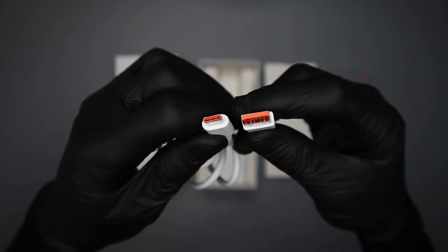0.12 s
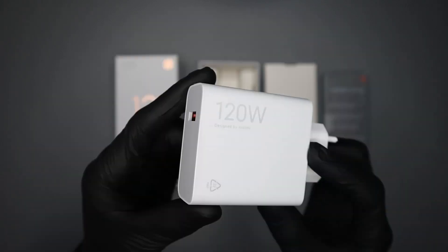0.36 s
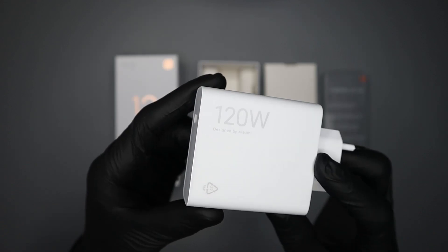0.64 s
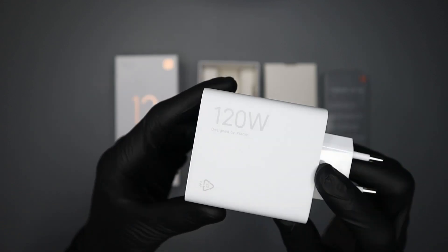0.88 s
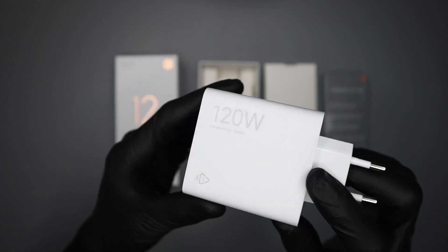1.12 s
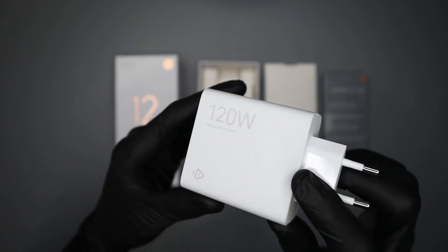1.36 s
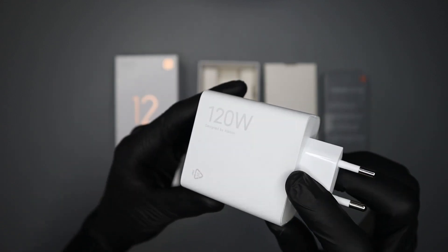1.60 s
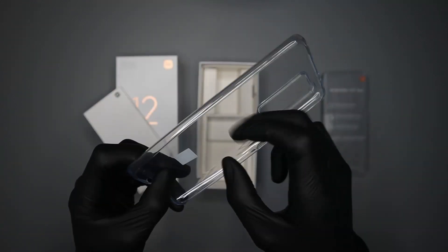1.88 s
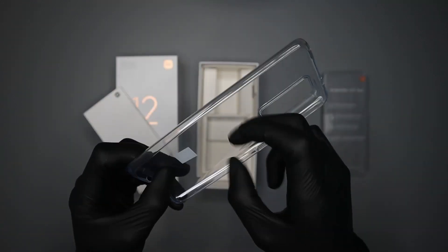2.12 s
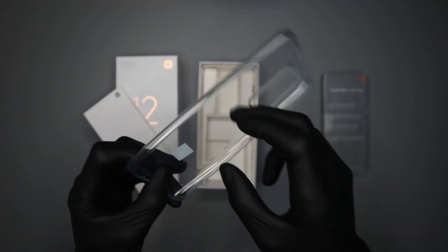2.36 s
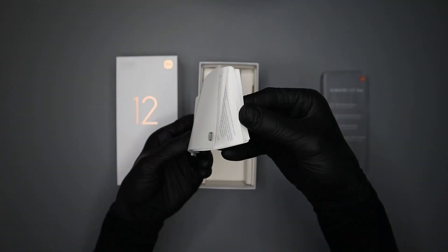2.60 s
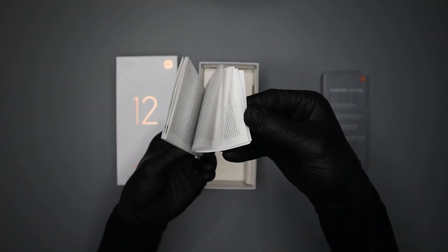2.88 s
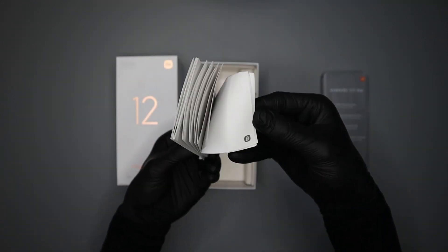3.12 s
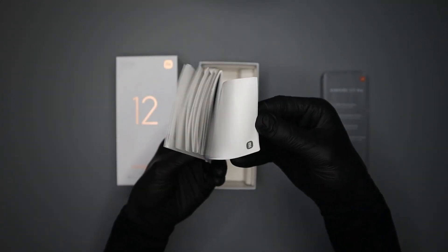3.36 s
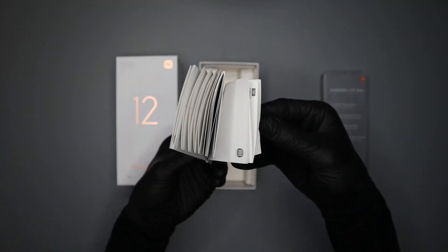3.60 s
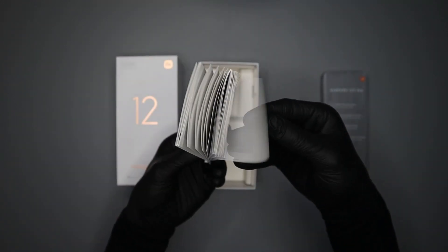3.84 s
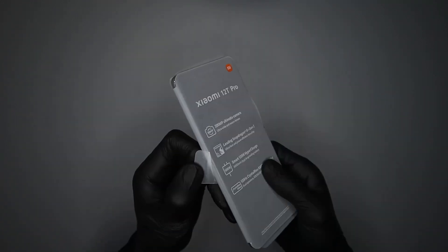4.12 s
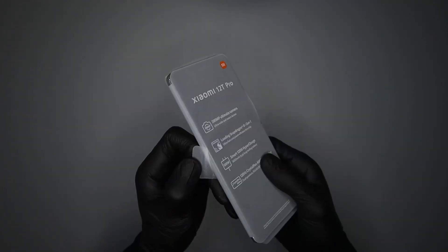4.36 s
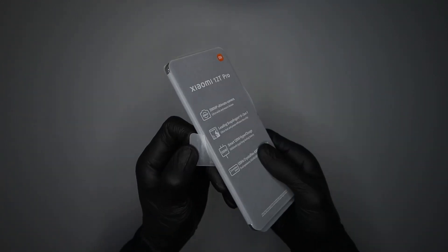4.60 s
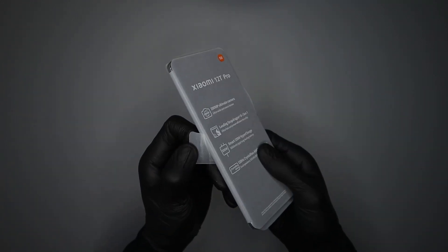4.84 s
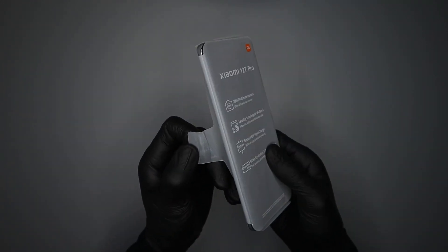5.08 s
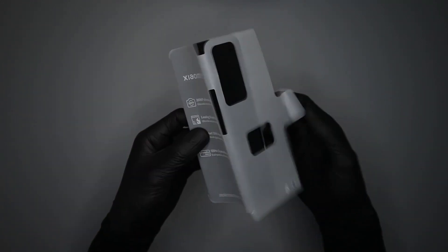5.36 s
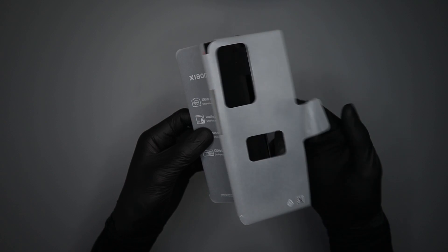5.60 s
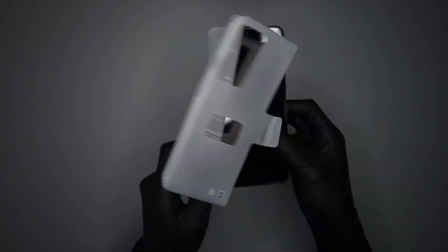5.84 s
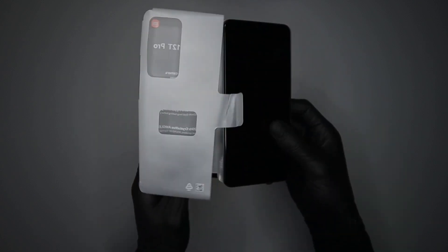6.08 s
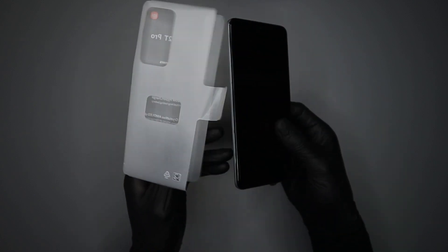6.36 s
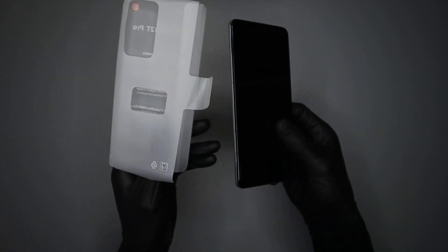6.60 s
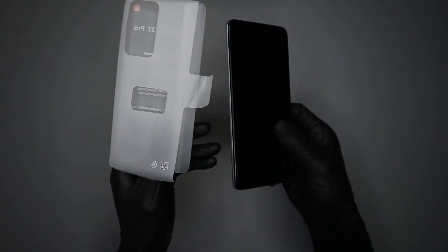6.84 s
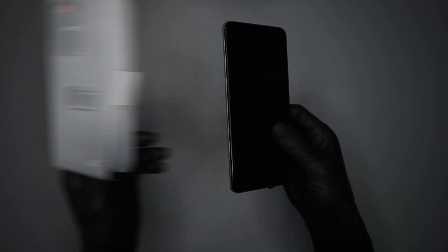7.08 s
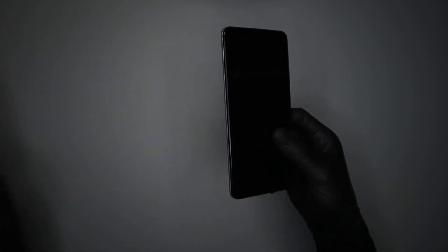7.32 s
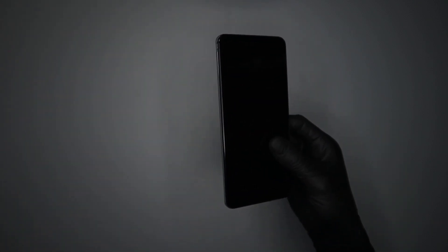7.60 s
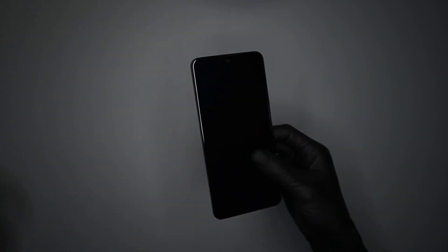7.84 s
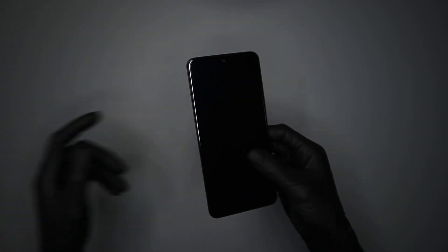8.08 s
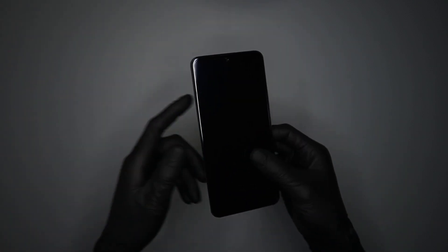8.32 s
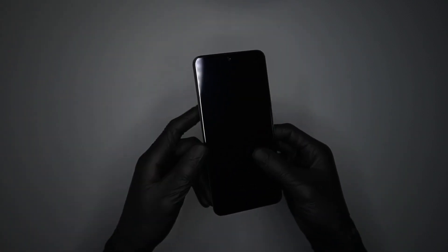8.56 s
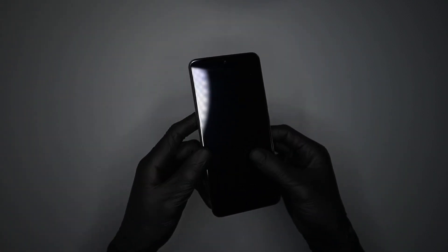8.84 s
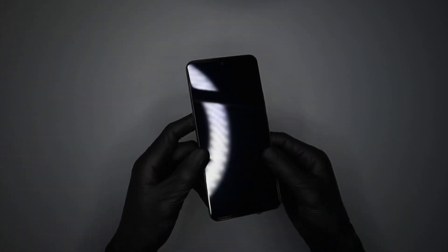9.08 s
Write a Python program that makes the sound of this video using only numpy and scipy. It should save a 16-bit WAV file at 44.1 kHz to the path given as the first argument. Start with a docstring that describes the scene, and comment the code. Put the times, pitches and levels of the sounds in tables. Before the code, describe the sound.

Close, quiet handling: plastic case flicked three times, paper pages fanned in bursts, a crackly sleeve pulled from a phone and laid aside.

```python
"""Gloved hands, booklet and sleeve

Close to a microphone in a small quiet room. A finger flicks a soft plastic case three times: cracks and rings.
A thumb riffles a booklet, then a stiff plastic sleeve is unstuck, slid off a phone and put aside:
short noise bursts for folds and snaps, creased hiss for friction and letting glue, resonances for the bodies.
Gloves tick and brush, glue creaks. A steady floor lies below; a diffuse tail follows, cut short three times.
"""
import sys
import numpy as np
from scipy import signal
from scipy.io import wavfile

SR = 44100
rng = np.random.default_rng(int(sys.argv[2]) if len(sys.argv) > 2 else 0)


def volts_from_decibels(level):
    """Turn decibel levels (scalar or array-like) into linear amplitude factors."""
    exponent = np.asarray(level, float) / 20
    return 10 ** exponent


def waveform_to_disk(signal):
    """Save audio, clipped to [-1, 1], as 16-bit WAV at the path in sys.argv[1]."""
    frames = np.transpose(np.atleast_2d(signal))
    scaled = np.clip(frames, -1, 1) * 32767
    samples = np.round(scaled).astype(np.int16)
    wavfile.write(sys.argv[1], SR, samples)


N = 405699

# half-octave band edges [Hz]
EDGES_HZ = 30 * 2 ** np.arange(0, 9.3, .5)
# room and microphone floor, relative density: (frequency [Hz], level [dB per Hz])
FLOOR = [(13, -42), (22, -10.5), (65, 0), (113, -17), (145, -4.5), (176, -18), (207, -9.5), (297, -15.5),
         (323, -21), (351, -15.5), (562, -19.5), (900, -23), (1010, -24.5), (15200, -32), (16500, -48)]
FLOOR_DB = -65.5
# colour of a thin sheet: (frequency [Hz], level per band [dB])
SHEET_COLOUR = [(300, 0), (600, -3), (1200, 0), (2200, -1.5), (3500, -2.5), (5000, -4), (7500, 1),
                (11000, -12), (16000, -11)]
# short brushes of a glove, and the swell of glue letting go just before the 4.94 s snap:
# (middle [s], length [s], level [dB], brightness [dB])
SHORT_SWELLS = [(0.068, 0.14, -71, -4), (4.903, 0.14, -71, 4.5), (4.941, .022, -38.5, 4),
                (6.708, .05, -55.5, 1.5), (6.773, 0.12, -56, 2.5), (6.896, .1, -64.5, -0.5),
                (7.0, 0.074, -68.5, -0.5), (8.275, 0.23, -76, 18)]
# small ticks of the gloves: (time [s], peak before colouring [dB], brightness [dB])
GLOVE_TICKS = [(0.0526, -40.5, -6.5), (.51, -55, 2), (.88, -51, 0), (1.43, -59, 0), (1.5686, -54, -6),
               (1.8, -55, -2), (1.822, -50, -9), (2.0905, -43, -2), (2.113, -45, 3), (6.6948, -43, 0),
               (6.8778, -48, -3), (7.1252, -45, -7), (8.4327, -48, 1), (8.8374, -47, 4)]
# glue creaks, dull knocks of phone on sleeve: (start [s], end [s], frequency [Hz], level [dB], ring [cycles])
GLUE_CREAKS = [(.61, 0.638, 900, -69, 30), (4.834, 4.951, 2440, -72, 55), (6.09, 6.124, 875, -52, 6.8),
               (6.143, 6.161, 900, -39, 10), (6.162, 6.196, 784, -45, 10), (7.6, 7.652, 2180, -54, 47),
               (8.279, 8.307, 912, -60.5, 31), (9.012, 9.2, 2695, -74, 20)]
# finger flicks on the case: (time [s], crack [dB], thump [dB])
CASE_FLICKS = [(1.9474, -10.5, -23), (2.19, -3.5, -17.5), (2.4017, -4.5, -17)]
# ringing of the case and the desk under it: (frequency [Hz], level per unit thump [dB], t60 [s])
CASE_MODES = [(109.6, 2.5, 0.037), (404, -7.5, 0.0084), (900, -15.5, 0.0081), (1400, -25.5, .015),
              (3240, -32.5, .008), (4320, -16, .006)]
# friction of the fanned pages: (time [s], level [dB], brightness [dB])
RIFFLE_RUB = [(2.56, -100, 15), (2.62, -66, 14), (2.68, -52, 3), (2.79, -48, -1), (2.82, -72, 10),
              (2.93, -57.5, 0), (2.98, -56, 3), (3.05, -64.5, 8.5), (3.2, -64, -6), (3.38, -57, -2),
              (3.6, -74, 4.5), (3.69, -56, 10), (3.77, -71.5, 9), (3.87, -64, 5), (3.93, -47, 2.5),
              (3.993, -70, 6)]
# pages slipping off the thumb:
# (time [s], peak before colouring [dB], dull part [dB], crisp part [dB], air push [dB])
PAGE_SLIPS = [(2.5926, -33.5, -4, 12.5, -56), (2.603, -35.5, -8.5, 5.5, -60), (2.6487, -25.5, -2, 1.5, -42),
              (2.6599, -23.5, -10, 4.5, -48), (2.6731, -30, 9, 0, -21), (2.7077, -25.5, -5, -1, -41),
              (2.7204, -25.5, -7, -1, -24), (2.7264, -31.5, 11, 5, -22), (2.7498, -31, 7, 4, -38),
              (2.7584, -22.5, -17, -4.5, -19), (2.7639, -20, -13, -3.5, -37), (2.7803, -29.5, 15, 2, -22.5),
              (2.83, -32, -11, 5.5, -53), (2.845, -31, -16, -4.5, -49), (2.8909, -30, -6, 3.5, -42),
              (2.9095, -24.5, 1.5, -0.5, -20), (2.9629, -25, 1, -1, -23.5), (2.9681, -28, 8, -2.5, -37),
              (2.9934, -28, -13, 0.5, -35), (3.0235, -24, 5.5, 0.5, -23), (3.0614, -15.5, -2.5, -12, -37),
              (3.0697, -16, -7, -2.5, -14), (3.0828, -14.5, 0, -16, -17.5), (3.2146, -46, 10, -15, -61),
              (3.234, -42, 10, 7.5, -54.5), (3.245, -37, 13, 0.5, -55), (3.255, -30, 7, -1.5, -52.5),
              (3.2703, -14.5, -2, -6, -18), (3.282, -26.5, 13.5, -12, -18), (3.3852, -19, 0.5, 3.5, -41),
              (3.3939, -8.5, 3.5, -62, -33), (3.41, -23.5, 9, -0.5, -9.5), (3.6137, -34.5, -19, -3, -53),
              (3.6338, -34, 3, -5.5, -42.5), (3.6546, -28, 2.5, 4, -22.5), (3.6755, -24, -1, -3.5, -28),
              (3.7724, -22.5, -0.5, 6.5, -25), (3.8442, -21.5, -2.5, 4, -19), (3.8916, -19.5, 2, 5, -29),
              (3.9134, -21, -5, -3, -25), (3.9256, -18.5, -5, 2.5, -41), (3.9374, -20.5, -5, -6.5, -17),
              (3.942, -16.5, -4.5, 1.5, -21), (3.9577, -21, 8.5, -2.5, -16), (3.9838, -34, -3, -4, -24)]
# snaps and creases of the sleeve:
# (time [s], peak before colouring [dB], dull part [dB], crisp part [dB], air push [dB])
SLEEVE_SNAPS = [(4.3219, -26, -9, -5, -62), (4.9416, -4, -10, -2.5, -52), (4.9711, -16, -11.5, -7.5, -55.5),
                (5.1556, -1, -12, -10.5, -38), (5.1804, -15.5, -1, -10.5, -51), (5.241, -26, -6, 1, -45),
                (5.366, -35, 4, -2, -46), (5.4506, -14, -21, -5, -43), (5.4628, -16, -29, -7.5, -57),
                (5.4762, -12, -11, -30, -35), (5.4894, -20, 1, -20, -37), (5.54, -23.5, 0, -2, -46),
                (5.6301, -29.5, 3, 3.5, -38), (5.8173, -35, 6.5, -5, -46), (5.879, -29.5, 1, -32, -40.5),
                (5.9523, -28.5, -3, -0.5, -49.5), (6.098, -43, 10, -13, -60),
                (6.141, -38.5, 14.5, -15, -56), (6.1559, -33.5, 2.5, -6, -56),
                (6.1788, -32, 4, -2.5, -69.5), (6.2786, -26, 10, -4, -35.5), (6.2921, -2, -7.5, -9, -21),
                (6.4147, -36.5, -4, 6.5, -27.5), (6.4436, -14, -0.5, -14.5, -51),
                (6.47, -32.5, -13, -0.5, -52.5), (6.4891, -21.5, -1, -8, -36),
                (6.551, -34.5, -12, 5.5, -39), (7.2621, -40.5, 9.5, -21, -42), (7.602, -39, 20, -18, -62),
                (7.6585, -45.5, 16, -10.5, -62)]
# friction of the sleeve peeling and sliding off the phone: (time [s], level [dB], brightness [dB])
SLIDE_RUB = [(5.25, -77, -10), (5.31, -47.5, 12), (5.385, -48, 20.5), (5.41, -49.5, 31.5),
             (5.441, -37.5, 11.5), (5.47, -33.5, -6), (5.51, -45.5, -5.5), (5.56, -47, -8),
             (5.61, -53.5, 0.5), (5.67, -59.5, 6), (5.789, -52, 4.5), (5.85, -59, -1), (5.909, -50.5, -2),
             (5.95, -51, 9), (6.06, -52, 3), (6.12, -62.5, 2.5), (6.171, -48, -6), (6.22, -49, 0.5),
             (6.27, -47.5, -3), (6.34, -40.5, -2.5), (6.39, -56.5, -2.5), (6.42, -41, 4.5),
             (6.459, -54, -17.5), (6.52, -43.5, -2), (6.571, -57, 0.5), (6.68, -82, -13)]
# friction of the sleeve laid on the desk: (time [s], level [dB], brightness [dB])
ASIDE_RUB = [(6.9, -80.5, -0.5), (7.22, -73.5, 5.5), (7.291, -61.5, 2.5), (7.35, -58, 4.5),
             (7.41, -61.5, 6), (7.47, -57.5, 5), (7.54, -63, 5.5), (7.6, -55.5, 4), (7.672, -57.5, -11)]
# resonances of the booklet: (frequency [Hz], width [Hz], level [dB])
BOOKLET_MODES = [(1860, 300, -9.5), (3080, 170, -8), (7570, 2600, -4.5)]
# resonances of the sleeve on the phone: (frequency [Hz], width [Hz], level [dB])
SLEEVE_MODES = [(1205, 26, 6.5), (1739, 29, -3.5), (2190, 73, 5), (2620, 34, -3.5), (3080, 47, -8.5),
                (4500, 84, -14), (4950, 57, -4.5), (5920, 81, -16), (7170, 320, -4)]
# broad resonances of the empty sleeve: (frequency [Hz], width [Hz], level [dB])
LOOSE_MODES = [(4300, 1700, -4.5), (13800, 3800, -2)]
# diffuse tail: (frequency [Hz], tail level [dB], t60 [s])
TAIL = [(101.1, -20, 0.19), (258, -13, 0.24), (696, -10, 0.3), (1810, -10.5, 0.25), (4950, -9, 0.34),
        (12000, -9, 0.26)]
# lasting resonances of room, desk and things on it: (frequency [Hz], level per unit click [dB], t60 [s])
ROOM_MODES = [(145, -63, 0.37), (422, -61.5, 0.19), (836, -67.5, .15), (1436, -55.5, .1)]
# starts of the stretches between which no tail is carried over: (time [s])
TAIL_STARTS_S = [0, 2.515, 3.995, 7.675]
LONGER_PER_DB, LENGTH_SPREAD_DB = 0.1756, 2.5   # a louder fold lasts longer
DULL_DB, DULL_PER_BRIGHT = -6, -.9              # a bright rub loses its low part
AIR_DB, AIR_PER_BRIGHT = -10, 0.042             # stirred air follows the rub
RUSTLE_INHERITS = .45                           # share of the fold's own colour kept by its rustle


def at_hz(points, hz, column=1):
    """Table column interpolated over log frequency."""
    points = np.array(points)
    return np.interp(np.log(hz), np.log(points[:, 0]), points[:, column])


def rms_one(x):
    """Scaled to unit rms."""
    return x / np.sqrt(np.mean(x ** 2) + 1e-20)


def band(x, low_hz, high_hz):
    """Band-passed signal."""
    return signal.sosfilt(signal.butter(2, [low_hz, high_hz], "band", fs=SR, output="sos"), x + 1e-18)


def bands():
    """Half-octave bands: number, edges, centre."""
    return [(k, a, b, np.sqrt(a * b)) for k, (a, b) in enumerate(zip(EDGES_HZ, EDGES_HZ[1:]))]


def drift(rate_hz):
    """Slow random signal of spread 1, computed at SR / 20."""
    r = np.exp(-40 * np.pi * rate_hz / SR)
    slow = signal.lfilter([1], [1, -2 * r, r * r], rng.standard_normal(N // 20 + 2002))[2000:]
    return np.interp(np.arange(N) / 20, np.arange(len(slow)), rms_one(slow))


def ring(clicks, hz, t60_s):
    """A unit click sets a decaying sine of initial height 1 ringing."""
    r, w = volts_from_decibels(-60 / (t60_s * SR)), 2 * np.pi * hz / SR
    return signal.lfilter([0, np.sin(w)], [1, -2 * r * np.cos(w), r * r], clicks + 1e-18)


def resonate(x, modes):
    """The sound plus a few resonances of the given body."""
    out = x.copy()
    for hz, width_hz, db in modes:
        r = np.exp(-np.pi * width_hz / SR)
        poles = [1, -2 * r * np.cos(2 * np.pi * hz / SR), r * r]
        out += volts_from_decibels(db) * signal.lfilter([(1 - r * r) / 2, 0, (r * r - 1) / 2], poles, x)
    return out


def sheet_db(hz, dull_db, crisp_db):
    """Band level of a thin sheet: its own colour, bent at both ends; wider bands are evened out."""
    octave = np.log2(hz / 3300)
    dull = np.clip(dull_db, -30, 15) * np.clip(-octave / 2, 0, 1)
    crisp = np.clip(crisp_db, -30, 15) * np.clip(octave - .5, 0, 1.5)
    return at_hz(SHEET_COLOUR, hz) + dull + crisp - 10 * np.log10(hz / 3300)


def snaps(rows, length_ms, rise_share, crack, push_hz, push_t60_s):
    """Each snap is a short dying burst in the colour of the sheet, with a low puff of displaced air."""
    rows, t = np.array(rows), np.arange(2000) / SR
    at = (rows[:, 0] * SR).astype(int)
    peak_db, dull_db, crisp_db = rows[:, 1:2], rows[:, 2:3], rows[:, 3:4]
    chance = rng.standard_normal((len(rows), 1))
    # length_ms is the typical decay constant at a -25 dB peak
    tau = length_ms / 1000 * volts_from_decibels(LONGER_PER_DB * (peak_db + 25) + LENGTH_SPREAD_DB * chance)
    envelope = np.exp(-t / tau) * (1 - np.exp(-t / (rise_share * tau)))
    bursts = rng.standard_normal((len(rows), 2000)) * envelope
    # the fold gives way at once
    bursts[:, :8] += crack * np.sign(bursts[:, :1]) * np.hanning(8) * [1, 1, 1, 1, -1, -1, -1, -1]
    bursts *= volts_from_decibels(peak_db) / np.abs(bursts).max(axis=1, keepdims=True)
    tint_db = 2.7 * rng.standard_normal((len(rows), len(EDGES_HZ)))     # no two folds share a colour
    spots, out = at[:, None] + np.arange(2000), np.zeros(N)
    for k, low, high, hz in bands()[6:]:
        train = np.zeros(N + 2000)
        tilt_db = 10 * np.log10(hz / 3300) * 1.123
        gain = volts_from_decibels(sheet_db(hz, dull_db, crisp_db) + tint_db[:, k:k + 1] + tilt_db)
        np.add.at(train, spots, bursts * gain)
        out += (-1) ** k * band(train[:N], low, high)
    puffs = np.zeros(N)
    puffs[at] = volts_from_decibels(rows[:, 4]) * np.sign(rng.standard_normal(len(rows)))
    return out + signal.lfilter([.03], [1, -.97], ring(puffs, push_hz, push_t60_s))


def hush(patchy_db):
    """Steady floor of band noise, its rumble wavering more than its hiss."""
    white, out = rng.standard_normal((2, N + 4000)), 0
    for k, low, high, hz in bands():
        waver_db = patchy_db * drift(1) * (100 / hz) ** 0.84
        out = out + volts_from_decibels(at_hz(FLOOR, hz) + waver_db) * band(white[k % 2], low, high)[4000:]
    return volts_from_decibels(FLOOR_DB) * rms_one(out)


def rustle(rows, under_db, t60_s, dull_db, crisp_db):
    """Power, dull part and crisp part of the rustle that dies away after each fold."""
    kicks = np.zeros((3, N))
    for s, peak_db, dull, crisp, _ in rows:
        kicks[:, round(s * SR)] = volts_from_decibels(2 * (peak_db + under_db)) * np.array([1, dull, crisp])
    power, dull, crisp = signal.lfilter([1], [1, -volts_from_decibels(-120 / (t60_s * SR))], kicks + 1e-18)
    return power, dull_db + RUSTLE_INHERITS * dull / power, crisp_db + RUSTLE_INHERITS * crisp / power


def friction():
    """Level, dull part and crisp part of all hiss; where motions overlap the stronger sets the colour."""
    t = np.arange(N) / SR
    motions = []
    for s, db, bright in map(np.transpose, (RIFFLE_RUB, SLIDE_RUB, ASIDE_RUB)):
        power = volts_from_decibels(2 * np.interp(t, s, db)) * (t > s[0]) * (t < s[-1])
        motions.append((power, np.interp(t, s, bright)))
    for s, length_s, db, bright in SHORT_SWELLS:
        hump = np.clip(1 - np.abs(2 * (t - s) / length_s), 0, 1) ** 4
        motions.append((volts_from_decibels(2 * db) * hump, bright))
    parts = [(power, DULL_DB + DULL_PER_BRIGHT * bright, bright) for power, bright in motions]
    pages = rustle(PAGE_SLIPS, under_db=-34.5, t60_s=0.27, dull_db=-7.5, crisp_db=-3)
    sleeve = rustle(SLEEVE_SNAPS, under_db=-35, t60_s=0.15, dull_db=-7.5, crisp_db=0)
    parts.append((pages[0] * (t < TAIL_STARTS_S[2]), *pages[1:]))
    parts.append((sleeve[0] * (t < TAIL_STARTS_S[3]), *sleeve[1:]))
    total = sum(power for power, _, _ in parts) + 1e-12
    dull_db = sum(power * dull for power, dull, _ in parts) / total
    crisp_db = sum(power * crisp for power, _, crisp in parts) / total
    return 10 * np.log10(total), dull_db, crisp_db


def rubs(grains_per_s, spread_db, creasing, patchy_db):
    """Friction hiss with tiny creases in it; the moving sheet also stirs the air at the microphone."""
    level_db, dull_db, crisp_db = friction()
    sizes = volts_from_decibels(spread_db * np.minimum(rng.exponential(1, N), 3.0))
    creases = (rng.random(N) < grains_per_s / SR) * sizes
    # every crease swells the hiss for a millisecond or two
    grain = 1 + creasing * signal.lfilter([1], [1, -.985], creases)
    white, clumps, out = rng.standard_normal((2, N)) * grain, drift(20.4), 0
    for k, low, high, hz in bands()[6:]:
        colour_db = sheet_db(hz, dull_db, crisp_db) + 10 * np.log10(hz / 3300)
        patches_db = patchy_db * (0.33 * clumps + drift(3.4) + 0.22 * drift(35))
        gain = volts_from_decibels(level_db - 9.0 + colour_db + patches_db)
        out = out + gain * rms_one(band(white[k % 2], low, high))
    air_db = level_db + AIR_DB + AIR_PER_BRIGHT * crisp_db
    return out + volts_from_decibels(air_db + 6.6 * drift(19)) * rms_one(band(rng.standard_normal(N), 38, 140))


def glove_ticks():
    """Small soft-edged bursts of the gloves, each with a puff of air."""
    rows = [(s, db, DULL_DB - bright, bright - 5.0, db - 23.5) for s, db, bright in GLOVE_TICKS]
    return snaps(rows, length_ms=2.8, rise_share=0.22, crack=0.45, push_hz=120, push_t60_s=0.04)


def creaks():
    """Short uneven stick-slip noise in one resonance."""
    t, out = np.arange(N) / SR, 0
    slips = rng.standard_normal(N) * volts_from_decibels(2.0 * drift(60))
    for start, end, hz, db, cycles in GLUE_CREAKS:
        gate = np.clip(np.minimum((t - start) / 0.001, (end - t) / 0.022), 0, 1)
        out = out + volts_from_decibels(db) * gate * rms_one(ring(slips, hz, cycles / hz))
    return out


def flicks():
    """Nail brushes the case, cracks it inward and rebounds at once; the case thumps and rings."""
    cracks, thumps = np.zeros(N), np.zeros(N)
    brush = rng.standard_normal((len(CASE_FLICKS), 300)) * np.exp(-np.arange(300) / 280.0)
    for (s, crack_db, thump_db), noise in zip(CASE_FLICKS, brush):
        i = round(s * SR)
        cracks[i] -= volts_from_decibels(crack_db)
        cracks[i + round(.00025 * SR)] -= volts_from_decibels(crack_db - 17.5)
        cracks[i + round(.0011 * SR)] -= volts_from_decibels(crack_db - 10.5)
        cracks[i - 330:i - 30] += volts_from_decibels(crack_db - 44) * noise
        thumps[i + round(.0008 * SR)] += volts_from_decibels(thump_db)
    contact = signal.windows.hann(round(.00024 * SR))      # contact time of the nail
    sharp = signal.sosfilt(signal.butter(2, 9000, fs=SR, output="sos"), cracks)
    nail = np.convolve(cracks, contact)[:N] + volts_from_decibels(-4.5) * sharp
    return nail + sum(volts_from_decibels(db) * ring(thumps, hz, t60_s) for hz, db, t60_s in CASE_MODES)


def corners(per_s=55, over_rub_db=20, spread_db=3.5):
    """Page corners ticking past at random, their strength following the riffle."""
    s, db, _ = np.transpose(RIFFLE_RUB)
    draws = rng.standard_normal((120, 3))
    at = s[0] + np.cumsum(rng.exponential(1, 120)) / per_s
    peak_db = np.interp(at, s, db) + over_rub_db + spread_db * draws[:, 0]
    rows = np.c_[at, peak_db, -4 + 7.0 * draws[:, 1], 1.5 + 4.0 * draws[:, 2], peak_db - 22.0]
    rows[at > s[-1], 1::3] = -150       # silence after the riffle
    rows[:, 0] = np.minimum(at, s[-1])
    return snaps(rows, length_ms=1.2, rise_share=0.05, crack=3.0, push_hz=101, push_t60_s=0.01)


def page_slips():
    """Pages slip off the thumb: sharp bursts with low air puffs."""
    return snaps(PAGE_SLIPS, length_ms=2.8, rise_share=0.038, crack=3.0, push_hz=100, push_t60_s=0.0069)


def sleeve_snaps():
    """Stiff plastic snaps and creases: longer bursts with low air puffs."""
    return snaps(SLEEVE_SNAPS, length_ms=4.2, rise_share=0.045, crack=0.45, push_hz=120.6, push_t60_s=0.025)


def room(x, build_s):
    """Diffuse tail fed by the energy of each band, plus lasting modes; each stretch starts without a tail."""
    white, out = rng.standard_normal((2, N)), np.zeros(N)
    marks = [round(s * SR) for s in TAIL_STARTS_S] + [N]
    stretches = list(zip(marks, marks[1:]))
    rise = np.exp(-1 / (build_s * SR))
    for k, low, high, hz in bands()[2:]:
        fall = volts_from_decibels(-120 / (at_hz(TAIL, hz, column=2) * SR))     # power decay per sample
        power = band(x, low, high) ** 2
        feed, poles = [(1 - rise) * (1 - fall)], np.convolve([1, -rise], [1, -fall])
        stored = np.concatenate([signal.lfilter(feed, poles, power[a:b]) for a, b in stretches])
        out += volts_from_decibels(at_hz(TAIL, hz)) * np.sqrt(np.abs(stored)) * rms_one(band(white[k % 2], low, high))
    for hz, db, t60_s in ROOM_MODES:
        out += volts_from_decibels(db) * np.concatenate([ring(x[a:b], hz, t60_s) for a, b in stretches])
    return out


def scene():
    """Booklet, sleeve and glove sounds take on resonances, the rest is added plain; the room answers the sum."""
    rubbing = rubs(grains_per_s=390, spread_db=8.5, creasing=0.058, patchy_db=4.24)
    t = np.arange(N) / SR
    reading = t < TAIL_STARTS_S[2]      # rubbing takes the booklet's resonances
    apart = t > ASIDE_RUB[1][0]         # the sleeve is off the phone
    booklet = resonate(page_slips() + corners() + rubbing * reading, BOOKLET_MODES)
    # all glove ticks, early ones too, take the sleeve's resonances
    phone = resonate(sleeve_snaps() + glove_ticks() + rubbing * (~reading & ~apart), SLEEVE_MODES)
    loose_sleeve = resonate(rubbing * apart, LOOSE_MODES)
    direct = flicks() + booklet + phone + loose_sleeve + creaks() + hush(patchy_db=3.0)
    return (direct + room(direct, build_s=0.001))[None]


def top_cut(x):
    """Nothing passes above the cut-off."""
    return signal.sosfilt(signal.butter(12, 16820, fs=SR, output="sos"), x)


def record(dry):
    """The microphone drops the deepest bass."""
    mix = signal.sosfilt(signal.butter(2, 55, "high", fs=SR, output="sos"), dry)
    return top_cut(mix)


dry = scene()
out = record(dry)
waveform_to_disk(out)
```